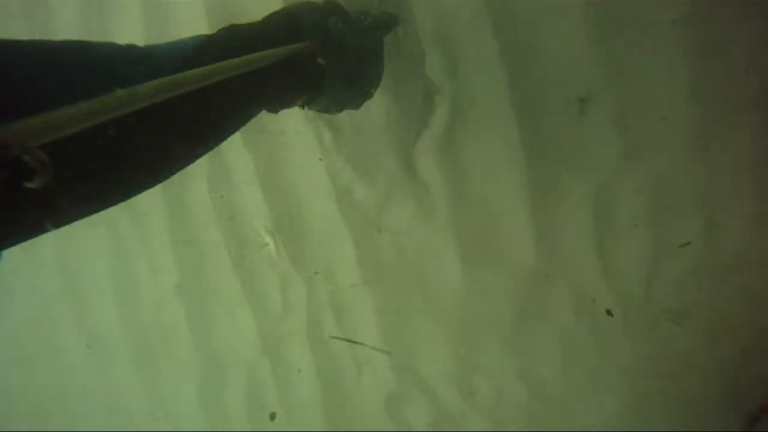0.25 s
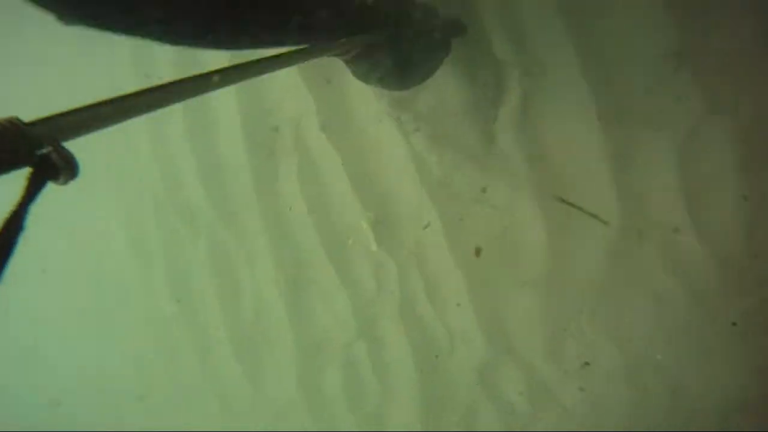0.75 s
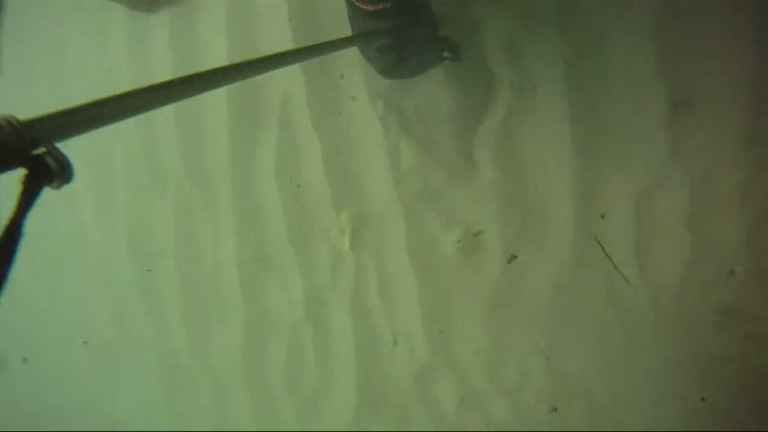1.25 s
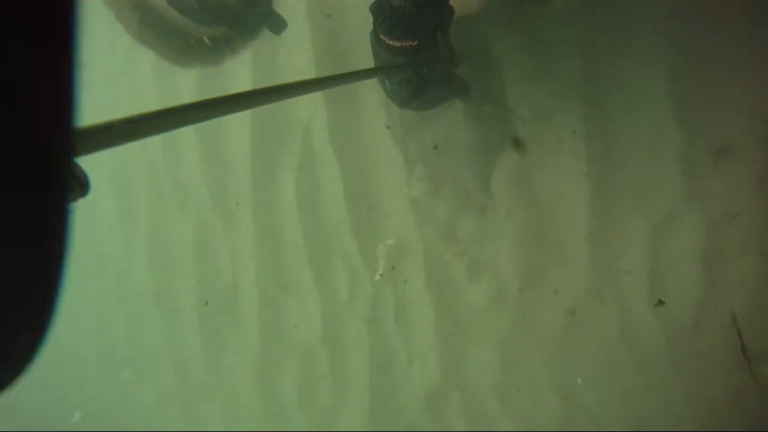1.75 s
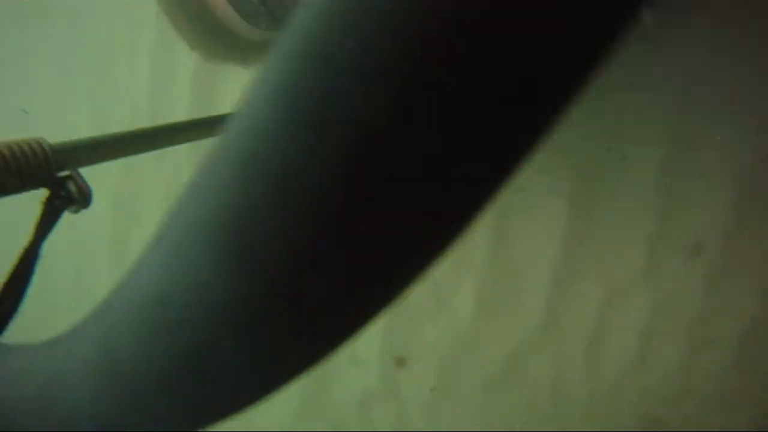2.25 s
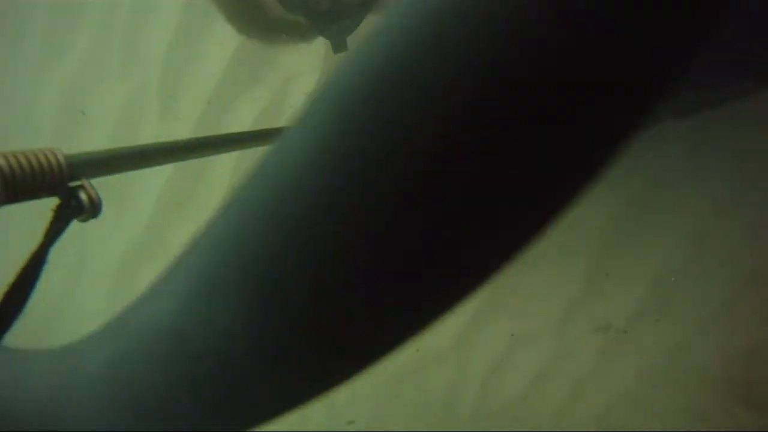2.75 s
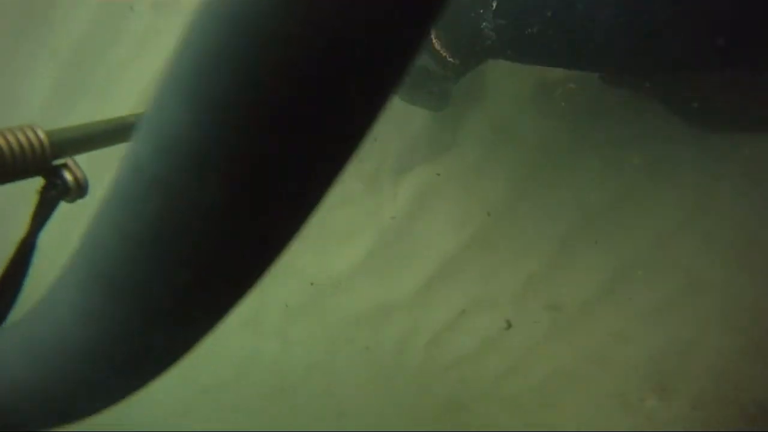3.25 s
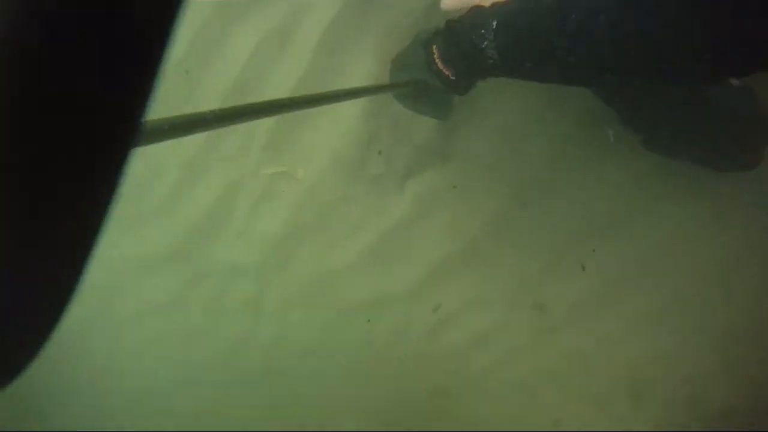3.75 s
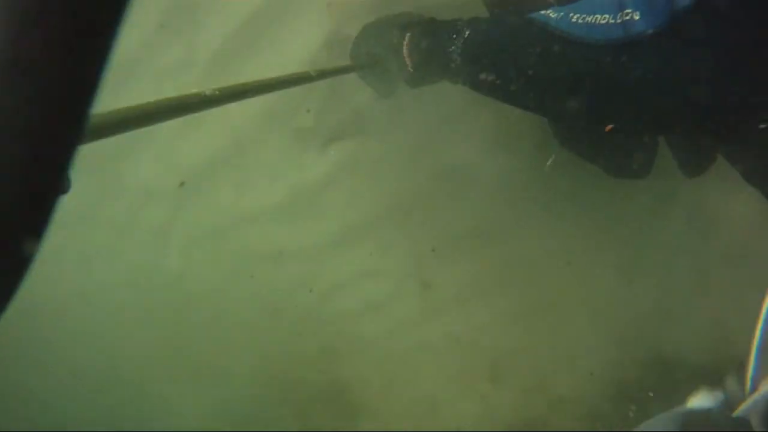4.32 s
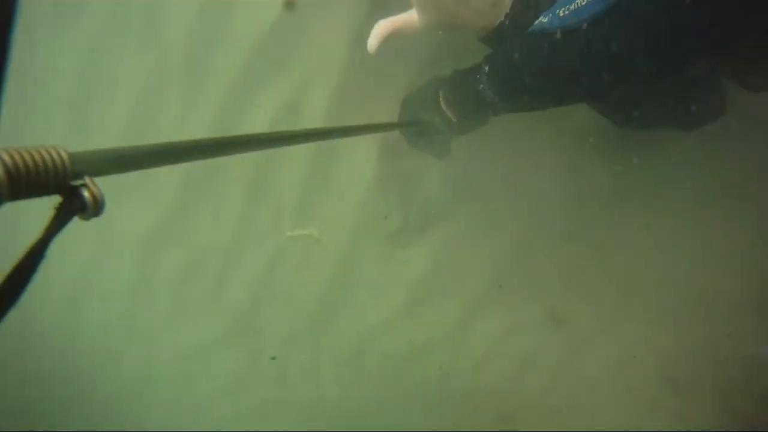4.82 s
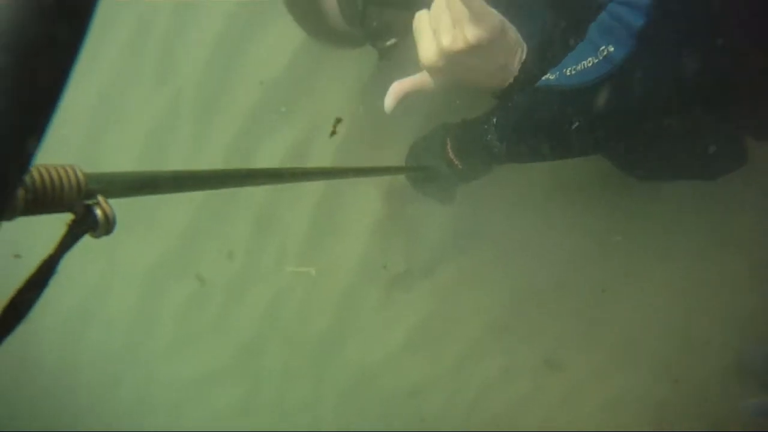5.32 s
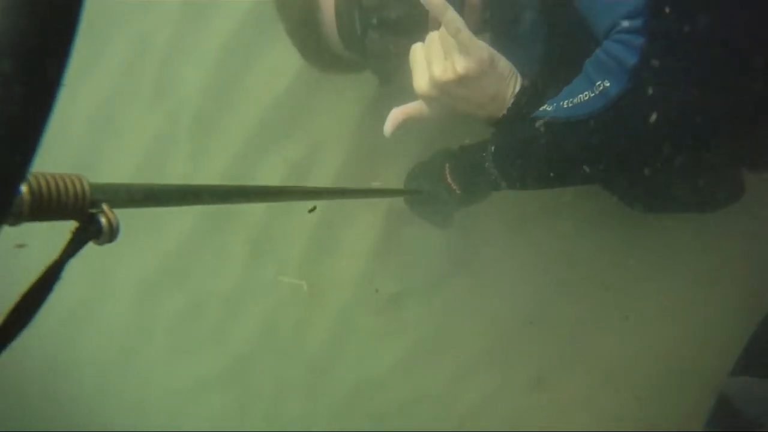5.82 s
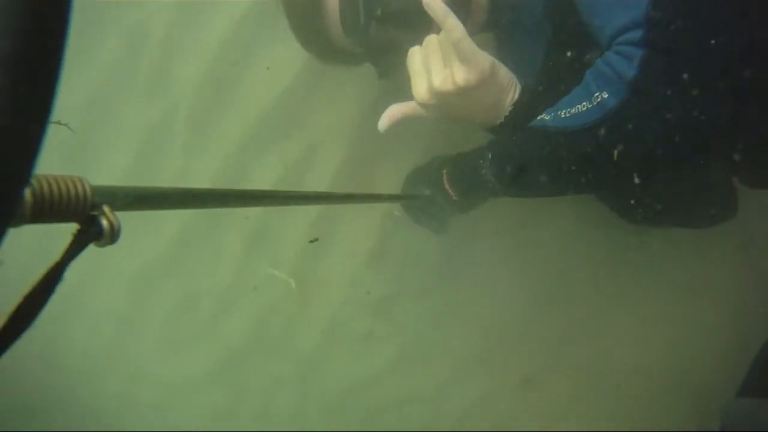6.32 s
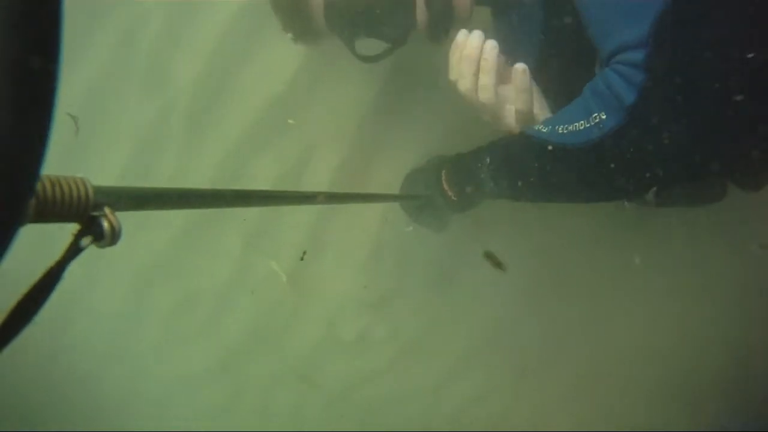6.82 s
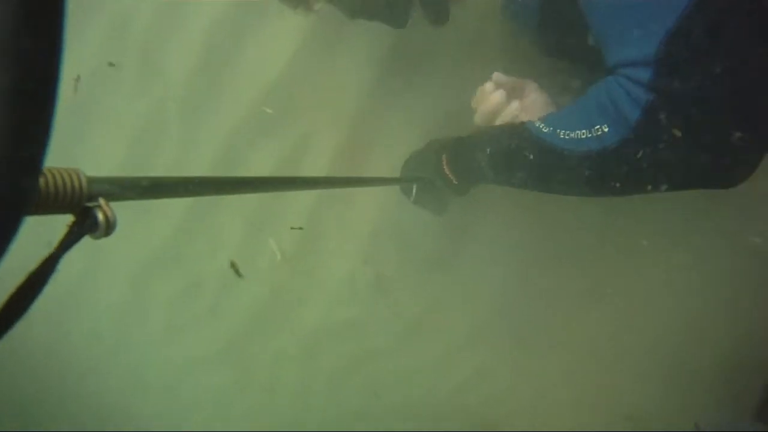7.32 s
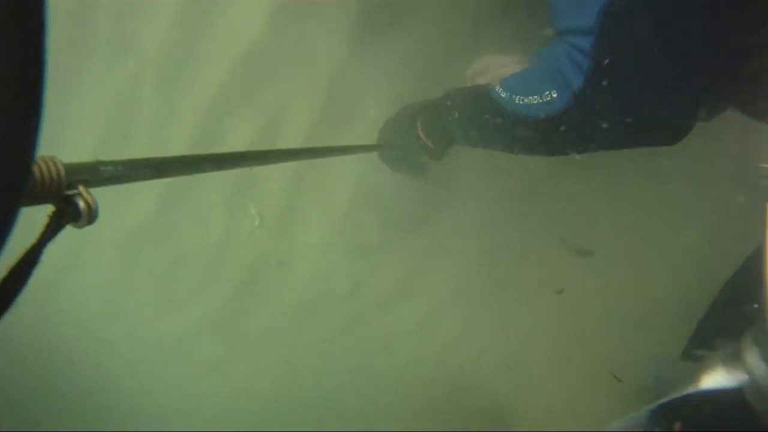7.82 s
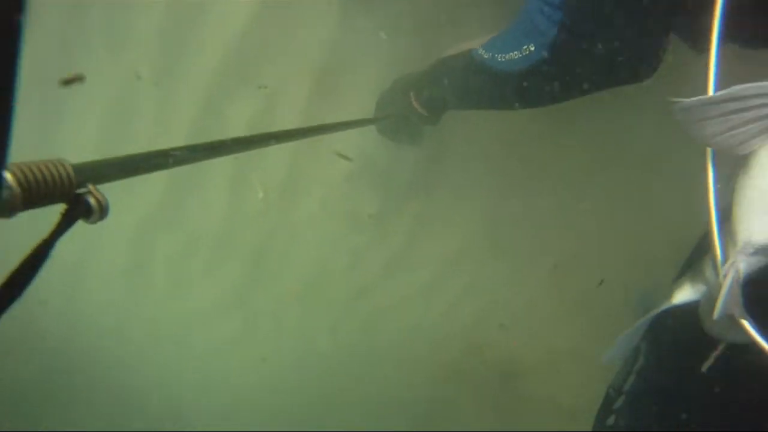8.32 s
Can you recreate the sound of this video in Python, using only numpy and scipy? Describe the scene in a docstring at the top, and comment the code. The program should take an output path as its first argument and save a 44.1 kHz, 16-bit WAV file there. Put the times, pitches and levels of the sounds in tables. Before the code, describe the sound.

Close contact sound under water. Hard clunks of a shaken metal shaft come almost at once, overlapping with deep thuds and stick-slip scrapes. Small steel ticks and juddering rubs continue over soft churning water; another knock cluster strikes around the middle. It calms to light ticks and low sway, then ends in heavy knocks, booms and a water rush. Dry, muffled, centred, with a low-fidelity gritty edge.

```python
"""Water swishes past and steel ticks faintly; then hard knocks come in bursts, with thuds, scrapes and low booms.
Under water, a speared fish thrashes on a steel shaft while a diver works the shaft through his glove.
Jerks knock through the speargun into the camera housing: short contacts drive damped resonances.
Water and sand are shaped noise whose level follows the flow; the gun sways as low rumble.
The camera holds its samples at a low rate, which mirrors every sound into a thin, gritty treble."""
import sys
import numpy as np
from scipy import signal
from scipy.fft import rfft, irfft, next_fast_len
from scipy.io import wavfile
from scipy.ndimage import uniform_filter1d, map_coordinates

SR = 44100
rng = np.random.default_rng(int(sys.argv[2]) if len(sys.argv) > 2 else 0)


def to_wav(sig):
    """Store sig (one row per channel, or 1-D mono) as 16-bit WAV at the path in sys.argv[1].

    Samples outside -1..1 are clipped; the rate is SR.
    """
    pcm = np.clip(np.atleast_2d(sig), -1, 1) * 32767
    pcm = np.round(pcm).astype(np.int16)
    wavfile.write(sys.argv[1], SR, pcm.T)  # frames by channels


N = 377937

# Event and layer levels are nominal; the function that plays them may add a fixed trim in dB.


def amp(db):
    """Decibels to gain."""
    return 10 ** (np.asarray(db) / 20)


def unit(x):
    """Scale to rms 1."""
    return x / np.sqrt(np.mean(x ** 2) + 1e-20)


def burst(x):
    """Scale a short sound to the energy of 20 ms at rms 1."""
    return x / np.sqrt(np.sum(x ** 2) / (SR / 50) + 1e-20)


def curves(rows):
    """One value per sample for each column after the time."""
    s, *cols = np.transpose(rows)
    return [np.interp(np.arange(N) / SR, s, c) for c in cols]


def wobble(rate_hz):
    """Smooth random curve with rate_hz knots per second."""
    return map_coordinates(rng.standard_normal(int(N * rate_hz / SR) + 4), [np.arange(N) * rate_hz / SR])


def filtered(x, response):
    """x times a complex response of frequency."""
    m = next_fast_len(len(x) + 8192)
    spectrum = rfft(x, m) * response(np.fft.rfftfreq(m, 1 / SR))
    return irfft(spectrum, m)[:len(x)]


def coloured(x, points):
    """x through a zero-phase spectrum of (f/Hz, level/dB) points, at rms 1."""
    hz, db = np.transpose(points)
    return unit(filtered(x, lambda f: amp(np.interp(np.log(f + 1), np.log(hz + 1), db))))


def modes(table, f, polarity=-1):
    """Response of damped resonances; neighbours of like polarity leave notches between them."""
    total = 0
    for k, (centre, width, db) in enumerate(table):
        damping = 1j * f * width
        total = total + polarity ** k * amp(db) * damping / (centre * centre - f * f + damping)
    return total


def varied(table, spread_db):
    """The same resonances, excited from a new spot: their levels shift at random."""
    return np.array(table) + np.outer(rng.standard_normal(len(table)), [0, 0, spread_db])


def lowpass(f, edge_hz, order):
    """Gain of a smooth low-pass."""
    return 1 / np.sqrt(1 + (f / edge_hz) ** (2 * order))


def grains(size, rate_hz, spread_db):
    """Tiny random contacts of uneven strength."""
    hits = rng.random(size) < rate_hz / SR
    return hits * rng.standard_normal(size) * amp(spread_db * rng.standard_normal(size))


def add(track, s, sound):
    """Mix a sound in at time s."""
    room = track[max(round(s * SR), 0):][:len(sound)]
    room += sound[:len(room)]


def contact(chatter, t60_s):
    """One push, then a dying chatter of smaller contacts."""
    t = np.arange(SR // 5) / SR
    after = grains(len(t), rate_hz=2500, spread_db=-3.5) * amp(-60 * t / t60_s)
    return (t == 0) + chatter * after / (np.linalg.norm(after) + 1e-9)


def swells(rows):
    """Power of smooth rises and falls, from (middle t/s, length/s, level/dB) rows."""
    t = np.arange(N) / SR
    return sum(amp(db) ** 2 / (1 + np.abs(np.pi * (t - s) / length) ** (2 * np.pi)) for s, length, db in rows)


# settling of water stirred by a jerk
WAKE_T60_S = 0.16


def wakes():
    """Power of the water stirred by the jerks; it decays exponentially after each."""
    shoves = np.zeros(N)
    for s, _, _, thud_db in JERKS:
        add(shoves, s, amp([thud_db]) ** 2)
    return signal.lfilter([1], [1, -amp(-60 / (WAKE_T60_S * SR)) ** 2], shoves)


def stirred(steady_db, swish_rows, wake_db):
    """Level in dB of steady flow, swishes and wakes, summed as power."""
    return 10 * np.log10(amp(steady_db) ** 2 + swells(swish_rows) + amp(wake_db) ** 2 * wakes())


# gritty treble of sand, dry contacts and cracks: f/Hz, level/dB
GRIT_SPECTRUM = [(700, -42.5), (1100, -6), (1400, -3.5), (1750, -1), (2100, -3), (2600, -3.5), (3000, -8)]
# shaft and fittings, low body: f/Hz, width/Hz, level/dB
STEEL_BODY_MODES = [(423, 95, -11), (583, 41, -17), (716, 130, -6), (892, 66, 3), (1124, 145, 3.5),
                    (1213, 74, 5)]
# shaft and fittings, bright ring: f/Hz, width/Hz, level/dB
STEEL_RING_MODES = [(1280, 260, -20.5), (1670, 139, 0.5), (1763, 64, 3), (2060, 237, -2.5),
                    (2115, 183, -3.5), (2460, 255, -7.5)]


def steel(drive):
    """The shaft's low body and its bright ring; the ring carries the dry sound of the contact too."""
    body = filtered(drive, lambda f: modes(varied(STEEL_BODY_MODES, spread_db=3), f) / (1 + (f / 1500) ** 6))
    ring = filtered(drive, lambda f: modes(varied(STEEL_RING_MODES, spread_db=2.5), f))
    dry_contact = coloured(drive, GRIT_SPECTRUM)
    return body, unit(ring) + .5 * dry_contact


# water speed past the housing, as the level of its rush: t/s, level/dB
FLOW_LEVEL = [(0.12, -36.5), (0.42, -27.5), (0.82, -37.5), (1.05, -32.5), (1.56, -41), (2.3, -39.5),
              (2.63, -48), (3.32, -46), (3.55, -34.5), (3.9, -38.5), (4.55, -28), (4.89, -32),
              (4.98, -42.5), (6.0, -54), (6.5, -49.5), (7.7, -44), (8.05, -28.5), (8.28, -48.5)]
# swishes of a limb or fin: middle t/s, length/s, rush level/dB, churn level/dB
SWISH_EVENTS = [(0.0, 0.073, -37, -27), (0.057, 0.048, -30, -62), (0.65, 0.075, -28, -29.5),
                (0.944, .14, -30.5, -41), (1.428, 0.1, -31, -34), (1.79, 0.21, -35, -39.5),
                (2.23, 0.084, -26.5, -51), (2.469, 0.13, -32, -39.5), (2.542, 0.12, -41, -32.5),
                (2.704, 0.091, -41, -30.5), (3.01, 0.072, -28.5, -46), (3.174, 0.14, -36.5, -43),
                (3.257, .06, -51, -38.5), (3.608, 0.11, -31.5, -39), (4.012, 0.18, -48, -28),
                (5.164, 0.23, -38, -43), (6.369, 0.26, -41, -51.5), (7.181, 0.096, -33, -39.5),
                (7.977, 0.034, -28.5, -38)]
# gun swings and presses slowly on the housing: middle t/s, length/s, level/dB
GUN_SWINGS = [(0.29, 0.15, -26.5), (0.92, .18, -19), (1.76, .16, -28), (2.15, 0.73, -32.5),
              (2.79, 0.19, -22), (3.1, 0.46, -29.5), (3.45, .12, -27), (4.05, 0.72, -27.5),
              (5.16, 0.26, -33.5), (5.56, 0.29, -39), (7.21, 0.091, -31), (7.92, 0.18, -26.5),
              (8.47, 0.51, -24.5)]
# rush of water: f/Hz, level/dB per Hz
RUSH_SPECTRUM = [(260, -39), (450, -14.5), (556, -7), (612, -24.5), (705, -1.5), (752, 3.5), (820, -3),
                 (934, -2), (1100, -6), (1400, -28), (1500, -22), (1950, -46.5), (3300, -120)]
# soft, low eddies: f/Hz, level/dB per Hz
CHURN_SPECTRUM = [(45, -21), (75, -21), (135, 1.5), (190, -10.5), (230, 0), (295, -8), (345, 0), (430, -4),
                  (550, -11.5), (650, -13), (850, -44), (1400, -120)]
# sway of the gun: f/Hz, level/dB per Hz
RUMBLE_SPECTRUM = [(8, -11), (14, -1.5), (20, 0), (28, -9), (40, -19), (70, -24.5), (120, -39.5),
                   (250, -90)]
# at BRISK_DB of flow each layer has its _DB level; _GROWS is dB per dB of flow
BRISK_DB = -35
CHURN_DB, CHURN_GROWS = -40.5, 0.83
HISS_DB, HISS_GROWS = -52, 0.49
SWAY_DB, SWAY_GROWS = -31.5, 0.91
# stirred water re nominal thud level
WAKE_RUSH_DB, WAKE_CHURN_DB = -9.5, -8


def water():
    """Sand and small bubbles fizz on the housing and faintly ring the steel; eddies churn and the gun sways."""
    flow_db, = curves(FLOW_LEVEL)
    effort_db = flow_db - BRISK_DB
    rush_swishes = [(s, length, db) for s, length, db, _ in SWISH_EVENTS]
    churn_swishes = [(s, length, db) for s, length, _, db in SWISH_EVENTS]
    rush_db = stirred(flow_db, rush_swishes, WAKE_RUSH_DB)
    churn_db = stirred(CHURN_DB + CHURN_GROWS * effort_db, churn_swishes, WAKE_CHURN_DB)
    hiss_db = HISS_DB + HISS_GROWS * effort_db
    sway_db = 10 * np.log10(amp(SWAY_DB + SWAY_GROWS * effort_db) ** 2 + swells(GUN_SWINGS))

    eddies = wobble(45)
    rush_noise = coloured(grains(N, rate_hz=1800, spread_db=-1.5), RUSH_SPECTRUM)
    rush = amp(rush_db - 4 + 1.84 * eddies) * rush_noise
    churn_noise = coloured(rng.standard_normal(N), CHURN_SPECTRUM)
    churn = amp(churn_db - 5 + 0.73 * eddies) * churn_noise

    sand = rng.standard_normal(N)
    sand_ring = unit(filtered(sand, lambda f: modes(STEEL_RING_MODES, f)))
    fizz = unit(coloured(sand, GRIT_SPECTRUM) + 0.31 * sand_ring)
    hiss = amp(hiss_db + 1.4 * eddies + 1.1 * wobble(30)) * fizz

    swell = coloured(rng.standard_normal(N), RUMBLE_SPECTRUM)
    # evened out, so its level follows the motion
    swell /= np.sqrt(np.abs(uniform_filter1d(swell ** 2, SR // 8)) + 0.027)
    return rush + churn + hiss + amp(sway_db) * swell


# body and ring levels re flow
STRAY_PER_S, STRAY_BODY_DB, STRAY_RING_DB = 14, -15.5, -27.5


def rattle():
    """Loose fittings touch at random, harder as the water moves faster."""
    flow_db, = curves(FLOW_LEVEL)
    touches = grains(N, rate_hz=STRAY_PER_S, spread_db=1.5)
    drive = signal.fftconvolve(touches, contact(chatter=2.1, t60_s=0.059))[:N]
    body, ring = steel(drive)
    return amp(flow_db) * (amp(STRAY_BODY_DB) * unit(body) + amp(STRAY_RING_DB) * unit(ring))


# barrel flexes and booms after a hard pull: t/s, level/dB, f/Hz
BARREL_BOOMS = [(0.6, -19, 163), (0.754, -13, 168.5), (0.9, -20, 72), (2.982, -24.5, 130.3),
                (3.875, -13.5, 83), (3.972, -19.5, 129), (5.127, -15, 57.4), (7.783, -16, 91),
                (8.074, -16, 84.3), (8.398, -12.5, 146)]


def booms():
    """The barrel's slow bending note, a decaying sine, swells and dies in the water."""
    out, t = np.zeros(N), np.arange(SR // 3) / SR
    attack = 1 - np.exp(-t / 0.004)
    for s, db, hz in BARREL_BOOMS:
        decay = amp(db - 6 - 60 * t / 0.26)
        add(out, s, decay * attack * np.sin(2 * np.pi * hz * t))
    return out


# shaft slides and judders: t/s, length/s, body level/dB, ring level/dB
SCRAPE_EVENTS = [(0.452, 0.032, -36, -42), (0.631, 0.032, -24, -30), (0.763, 0.03, -26.5, -39),
                 (0.862, 0.042, -30, -34), (0.915, 0.028, -41, -34), (1.209, 0.017, -30.5, -27.5),
                 (1.295, 0.048, -27, -33), (1.359, 0.12, -43.5, -49.5), (1.578, 0.11, -44, -47.5),
                 (1.708, .16, -42, -42), (1.866, 0.135, -38, -38.5), (2.006, 0.013, -47, -34.5),
                 (2.023, 0.033, -42.5, -50), (2.181, 0.018, -36, -36.5), (2.198, 0.029, -21, -32),
                 (2.249, 0.016, -32, -27), (2.281, .027, -29.5, -29), (2.663, 0.03, -22, -24.5),
                 (2.688, 0.043, -32.5, -34), (2.801, 0.0091, -28, -33.5), (4.494, 0.084, -34, -53),
                   (3.723, 0.026, -31.5, -48.5), (4.064, 0.02, -32.5, -39.5), (4.297, 0.022, -29, -38.5)]
# median slip rate; smooth rubbing re slips
SLIPS_PER_S, RUB_DB = 270, -12


def scrapes():
    """Stick and slip: a quick, uneven train of slips drives the same steel, at a new spot in each stroke."""
    out = np.zeros(N)
    for s, length, body_db, ring_db in SCRAPE_EVENTS:
        size = int(max(length, .005) * SR)
        grip = map_coordinates(rng.standard_normal(size // 200 + 4), [np.arange(size) / 200])
        slip_phase = np.cumsum(SLIPS_PER_S * amp(2.6 * grip)) / SR
        slips = np.diff(np.floor(slip_phase), prepend=-1)
        uneven_slips = unit(slips * amp(3.0 * rng.standard_normal(size)))
        rub = uneven_slips + amp(RUB_DB) * rng.standard_normal(size)
        press = amp(2.5 * grip) * np.sqrt(1 - np.linspace(0, 1, size) ** 4)
        body, ring = steel(np.pad(rub * press, (0, SR // 10)))
        stroke = amp(body_db - 2.5) * unit(body) + amp(ring_db) * unit(ring)
        # offsets the padding's share of the rms
        add(out, s, stroke * np.sqrt(size / len(body)))
    return out


# light touches of steel on steel: t/s, body level/dB, ring level/dB
TICK_EVENTS = [(0.065, -27, -58), (0.848, -32, -45.5), (0.932, -19, -32.5), (0.948, -22, -24),
               (0.967, -28, -32), (1.209, -16, -38), (1.232, -18.5, -34), (1.269, -39, -43),
               (1.536, -29.5, -37.5), (1.745, -28, -37), (1.877, -28, -38.5), (2.096, -14, -27),
               (2.154, -25.5, -36.5), (2.567, -41, -47.5), (2.777, -23, -26.5), (2.925, -39, -37.5),
               (3.757, -21.5, -33), (4.024, -32.5, -47), (4.136, -22.5, -32.5), (4.229, -31, -42),
               (4.631, -23.5, -29.5), (4.871, -27.5, -45), (4.923, -35.5, -37), (5.025, -23, -30),
               (5.322, -43, -44.5), (5.405, -45, -49), (5.602, -28.5, -46), (5.65, -25.5, -41.5),
               (5.753, -50, -48), (5.88, -23.5, -32.5), (6.089, -40, -44), (6.301, -27, -35),
               (6.461, -45, -48), (6.556, -48, -50.5), (6.618, -42, -47), (6.829, -41, -55.5),
                        (6.889, -55, -48), (7.055, -39, -43), (7.56, -55, -48), (7.627, -64, -41.5),
               (8.079, -20.5, -29.5), (8.131, -14, -25), (8.319, -40, -49.5)]


def ticks():
    """Light contacts ring the shaft and its fittings."""
    out = np.zeros(N)
    for s, body_db, ring_db in TICK_EVENTS:
        body, ring = steel(contact(chatter=0.96, t60_s=0.08))
        add(out, s + 0.00091, amp(body_db - 9.0) * burst(body) + amp(ring_db - 5.5) * burst(ring))
    return out


# jerks of the fish: t/s, knock level/dB, knock centre f/Hz, thud level/dB
JERKS = [(0.389, -4, 800, -21), (0.483, 1.5, 685, -12.5), (0.579, -5, 921, -22), (0.678, -5.5, 820, -19),
         (0.74, -7, 890, -17.5), (0.847, -17.5, 930, -43), (1.11, -27, 840, -34), (1.23, -14, 750, -32),
         (1.93, -15.5, 953, -49), (1.938, -17.5, 891, -35), (2.097, -14, 1170, -58),
         (2.986, -22, 555, -20.5), (3.368, -31, 732, -29), (3.4, -7, 770, -14.5),
         (3.874, -42.5, 945, -28.5), (3.971, -24, 1040, -19.5), (4.205, -25, 890, -32),
         (4.299, -18.5, 920, -36.5), (4.372, -6.5, 730, -17), (4.425, -14, 720, -27),
         (4.473, -20.5, 735, -26.5), (4.501, -18, 930, -30), (4.858, -21, 775, -58),
         (5.086, -30, 1030, -55), (5.124, -36, 673, -35.5), (7.726, -26.5, 930, -58),
         (7.771, -28, 735, -29), (7.797, -21, 740, -27), (7.869, -15, 560, -23), (7.906, -23, 711, -26),
         (7.93, -18.5, 751, -27), (8.037, -12, 697, -24.5), (8.081, -9.5, 900, -10), (8.103, -24, 552, -18),
         (8.167, 2, 700, -10.5), (8.194, -18.5, 700, -32), (8.403, -0.5, 794, -12.5)]
# housing under a hard blow, upper resonances: f/Hz, width/Hz, level/dB
KNOCK_MODES = [(703, 80, 0), (790, 160, -10), (925, 90, -4), (1080, 140, -13)]
# housing under a hard blow, lower resonances: f/Hz, width/Hz, level/dB
THUD_MODES = [(75, 16, -1.5), (132, 20, -0.5), (162.5, 20, 0), (247.6, 31.3, -0.5), (339, 32, 0.5),
              (427.7, 51, 4.5), (530, 57, -1.5)]
# nominal crack re knock; above HARD_DB of knock it gains CRACK_GROWS extra dB per dB
CRACK_DB, HARD_DB, CRACK_GROWS = -26, -3, 3.5
# thud edge under a nominal 0 dB knock; weaker jerks thud more dully
THUD_EDGE_HZ, THUD_DULLS_DB_PER_OCTAVE = 515, 56.5


def jerks():
    """Each jerk shoves the gun: the housing thuds at once, knocks as the steel seats, and shudders on."""
    out = np.zeros(N)
    lead_s = .005

    def push(chatter, t60_s):
        """A contact after a short lead of silence."""
        return np.pad(contact(chatter, t60_s), (round(lead_s * SR), 0))

    for s, knock_db, centre_hz, thud_db in JERKS:
        crack_db = knock_db + CRACK_DB + CRACK_GROWS * max(knock_db - HARD_DB, 0)
        thud_edge_hz = THUD_EDGE_HZ * 2 ** (knock_db / THUD_DULLS_DB_PER_OCTAVE)
        upper, lower = varied(KNOCK_MODES, spread_db=1), varied(THUD_MODES, spread_db=2)

        def hardness(f):
            """Contact spectrum around the knock centre."""
            octaves = np.log2((f + 1) / centre_hz)
            return lowpass(f, edge_hz=1700, order=8) / (1 + (octaves / 0.31) ** 2)

        def low_modes(f):
            """Lower housing resonances, like polarity."""
            return modes(lower, f, polarity=1)

        knock = filtered(push(chatter=0.82, t60_s=0.018), lambda f: modes(upper, f) * hardness(f))
        thud = filtered(push(chatter=0.86, t60_s=0.046),
                        lambda f: low_modes(f) * lowpass(f, thud_edge_hz, order=7))
        shudder = filtered(push(chatter=15, t60_s=0.2),
                           lambda f: low_modes(f) * lowpass(f, edge_hz=246, order=3))
        crack = coloured(push(chatter=10.0, t60_s=0.023), GRIT_SPECTRUM)
        # thud 1 ms ahead of the knock
        add(out, s - lead_s - .001, amp(thud_db - 1.0) * (burst(thud) + .5 * burst(shudder)))
        add(out, s - lead_s, amp(knock_db - 9.0) * burst(knock) + amp(crack_db - 8.5) * burst(crack))
    return out


def scene():
    """Sum of all layers inside the sealed housing, alike on both sides."""
    sound = water() + rattle() + booms() + scrapes() + ticks() + jerks()
    return np.array([sound, sound])


HOLD_HZ, TOP_HZ = 6000, 8328  # sample-and-hold rate; hard band limit


def record(dry):
    """Overload, then a sample-and-hold that mirrors the narrow band around its rate, then the band limit."""
    carrier = 1 + 2 * np.cos(2 * np.pi * HOLD_HZ * np.arange(N) / SR)
    out = []
    for x in dry:
        narrow = filtered(x, lambda f: lowpass(f, edge_hz=2765, order=22))
        mirrored = np.clip(narrow, -1, 1) * carrier
        held = filtered(mirrored, lambda f: np.sinc(f / HOLD_HZ))
        out.append(filtered(held, lambda f: lowpass(f, edge_hz=7444, order=22) * (f < TOP_HZ)))
    return np.clip(out, -1, 1)


dry = scene()
out = record(dry)
to_wav(out)
```